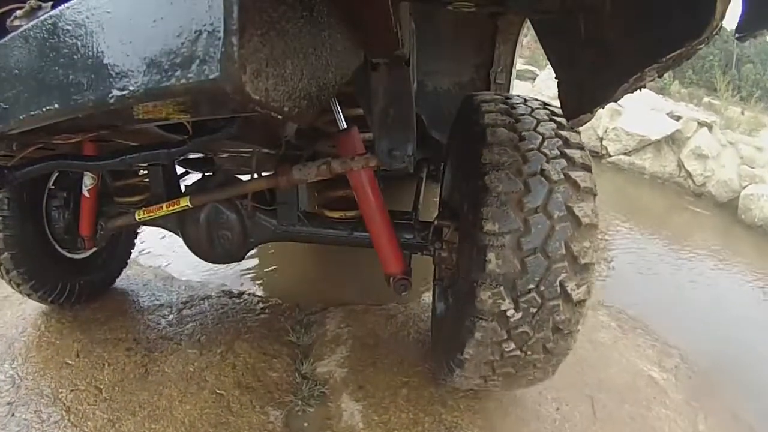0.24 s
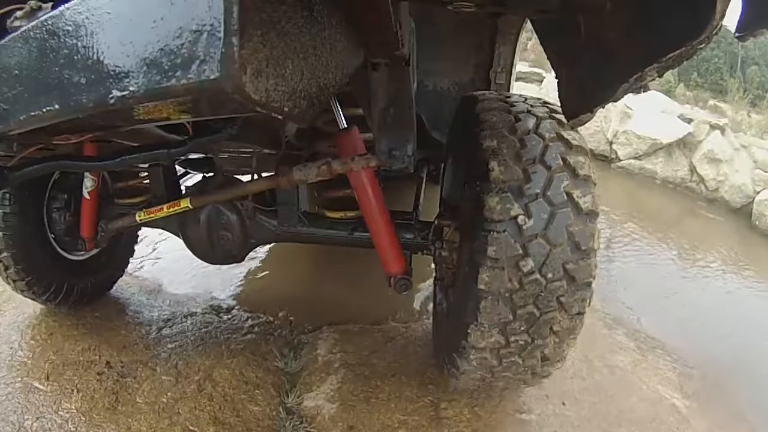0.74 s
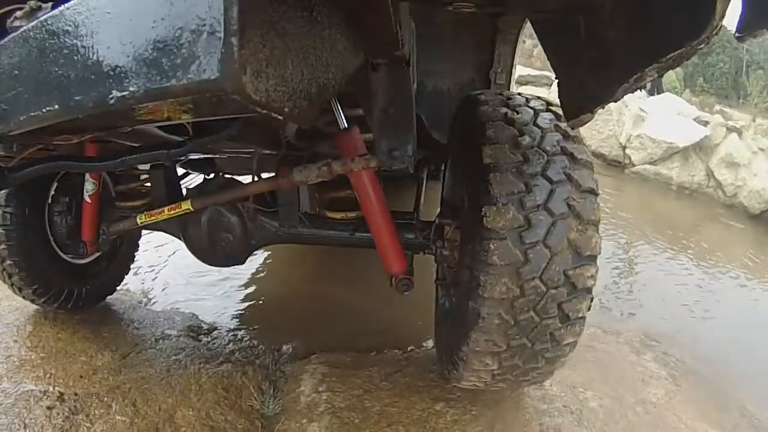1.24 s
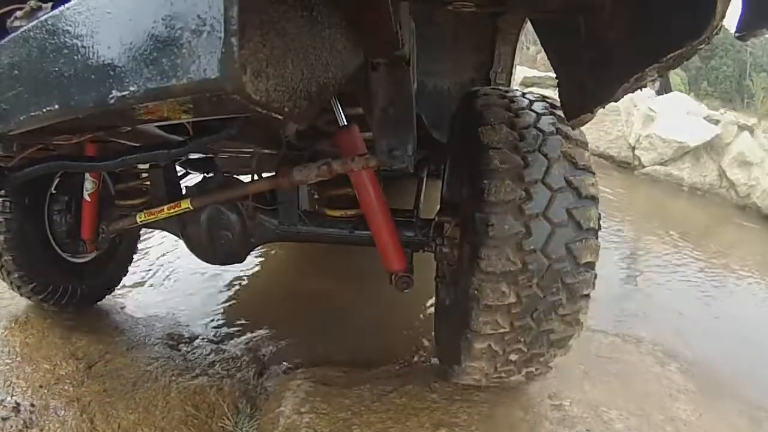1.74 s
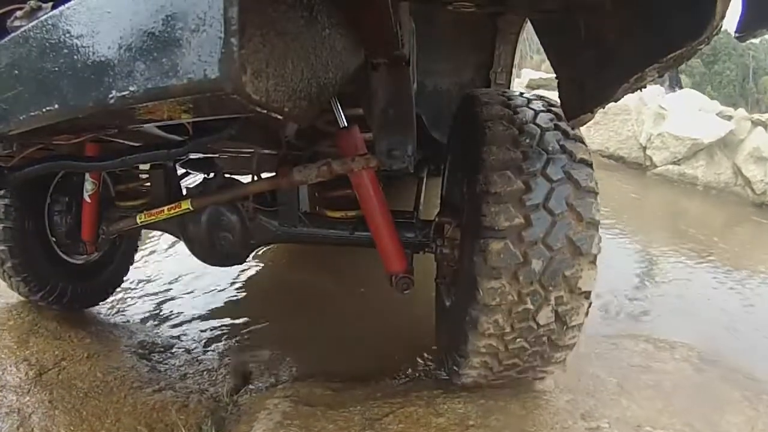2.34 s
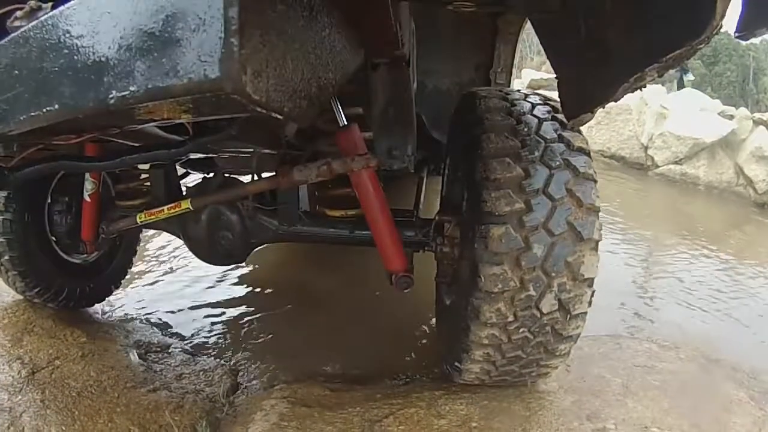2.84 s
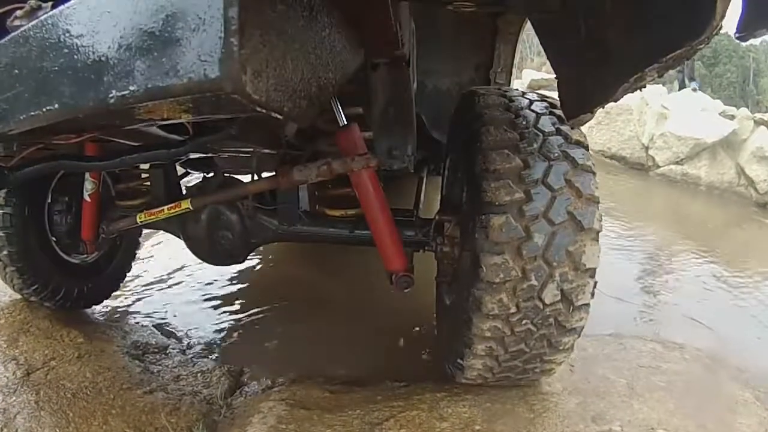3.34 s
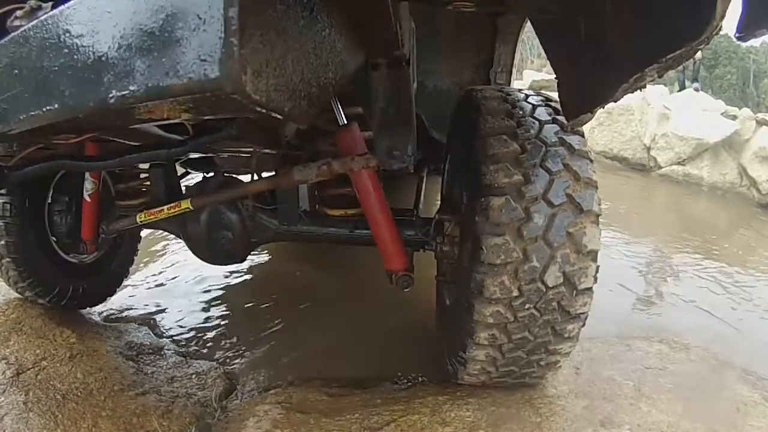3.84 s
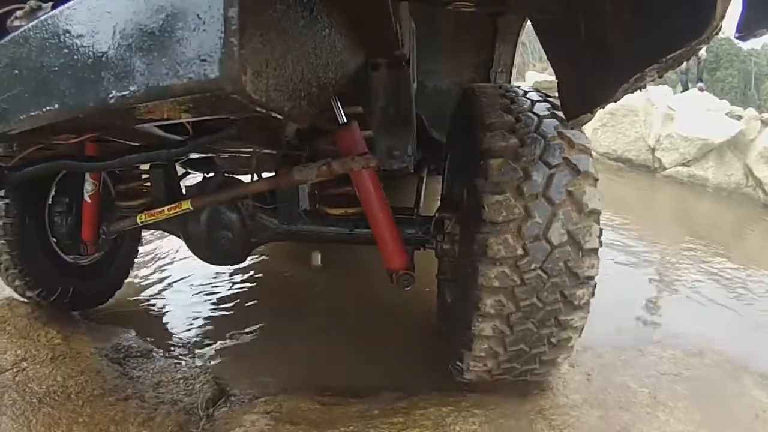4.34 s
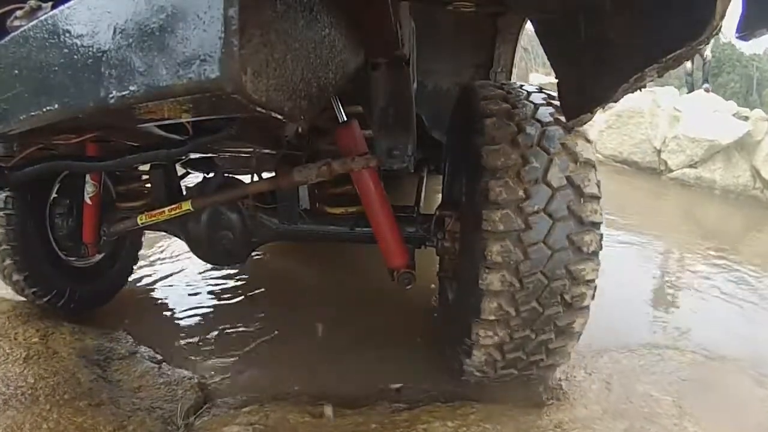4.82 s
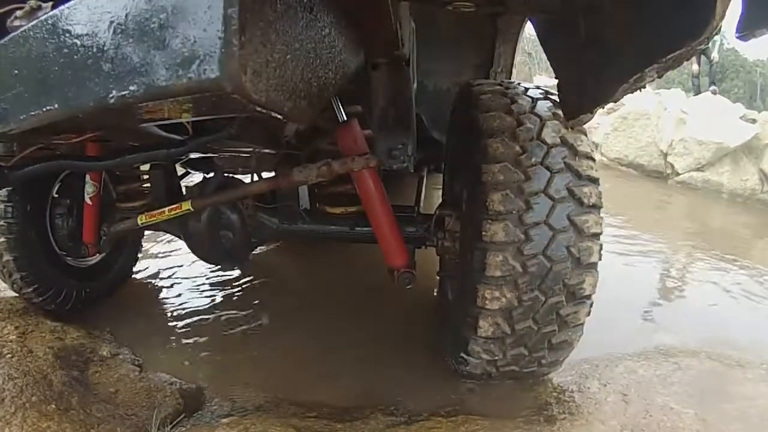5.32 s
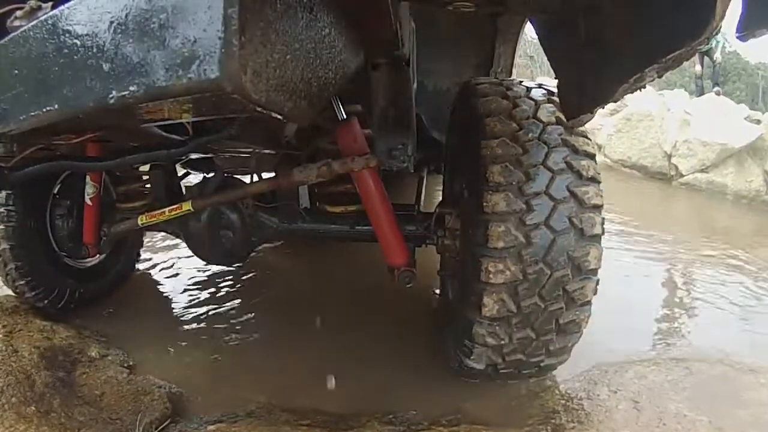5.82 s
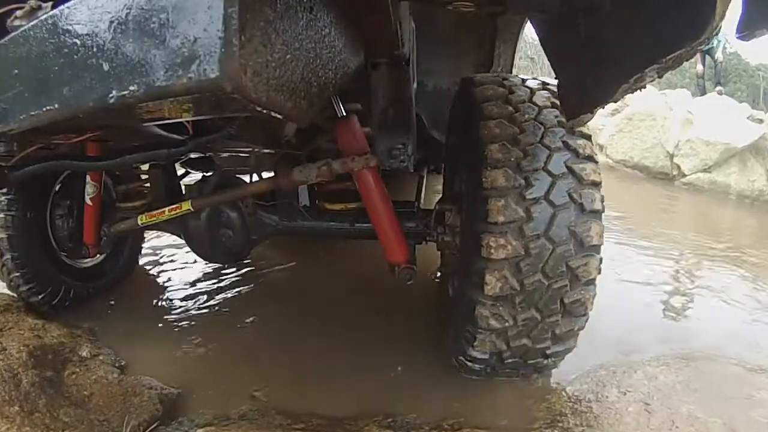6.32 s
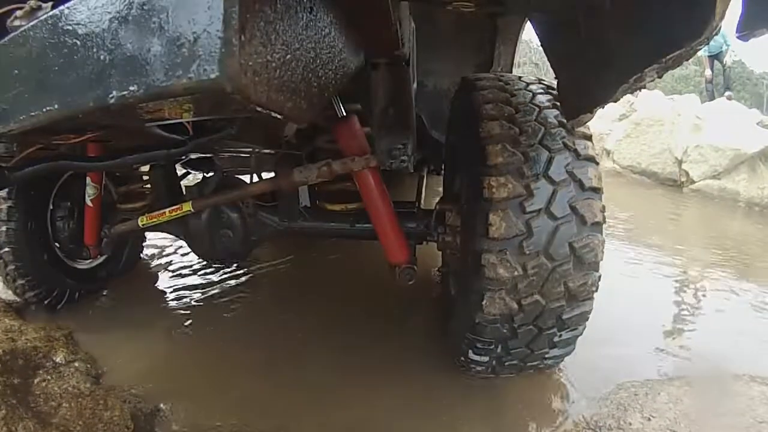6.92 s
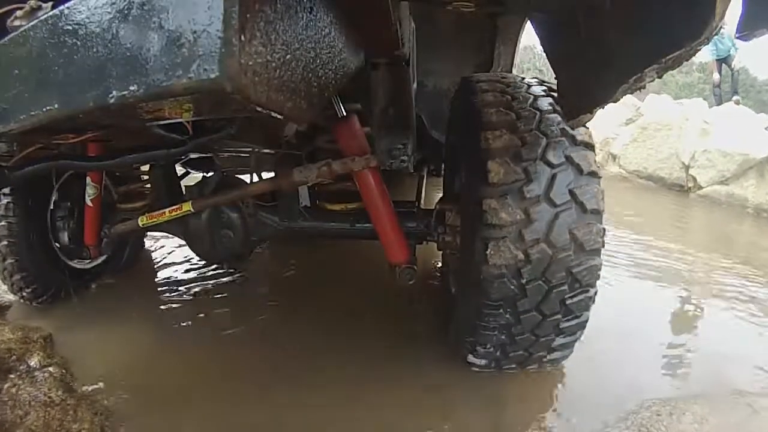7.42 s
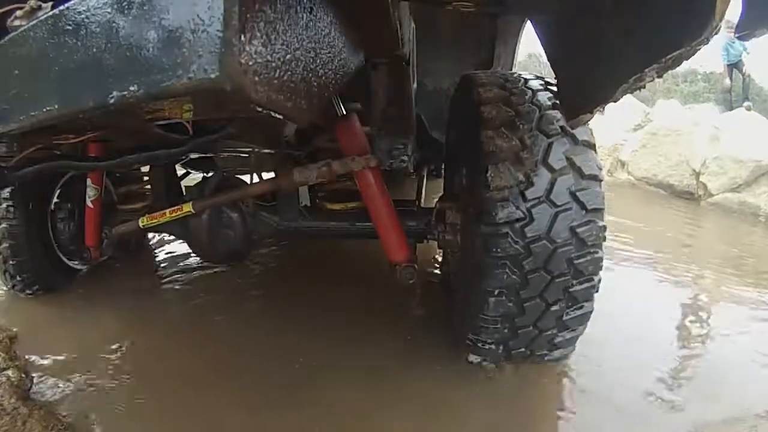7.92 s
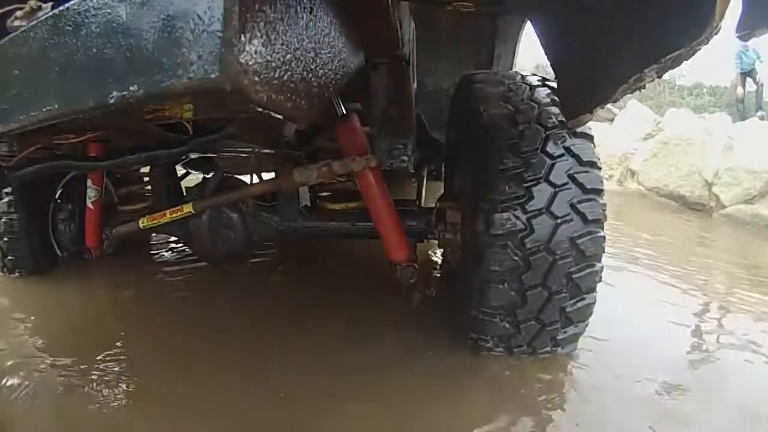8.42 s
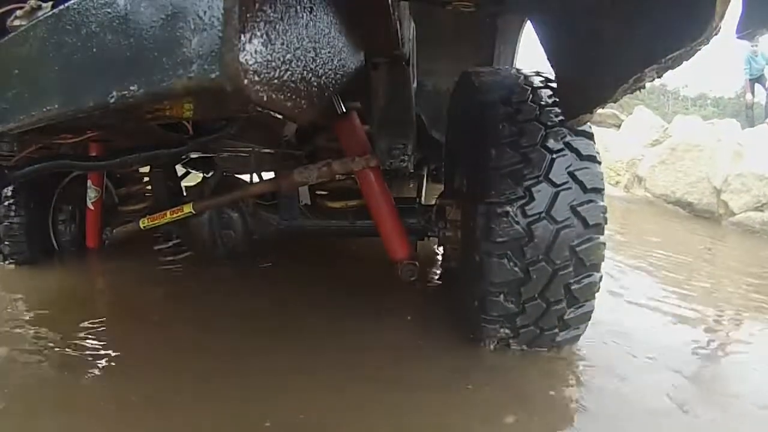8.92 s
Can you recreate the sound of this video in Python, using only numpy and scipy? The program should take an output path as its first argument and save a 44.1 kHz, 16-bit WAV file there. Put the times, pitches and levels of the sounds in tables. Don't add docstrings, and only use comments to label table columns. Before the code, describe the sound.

A low, lumpy six-cylinder diesel idle runs throughout, about 39 pulses a second, with rough frame rumble, muted injector clatter and a loosely ringing panel. The sealed microphone is bolted to the chassis, so everything is close, bassy and dull on top. From 0.2 to 1.5 seconds water slaps the underside, with a sharp metal knock at 0.6. Short hollow rubber groans near 200 hertz begin softly, jump out at 2.5 and are loudest from 3.0 to 3.3, with tiny crackles; the engine ducks, then recovers over about a second. More groans come between 4.7 and 6.1, with deep tyre thumps at 4.9 and 5.3 to 5.6. A very faint squeak passes at 6.15. Water swishes from 7.6 to 8.3; thumps land at 7.9 and 8.4. At 8.8 the hardest thump, a short dull clang and a splash arrive together, then idling continues to about 9.2.

```python
import sys
import numpy as np
from scipy import signal
from scipy.fft import rfft, irfft
from scipy.io import wavfile
from scipy.ndimage import uniform_filter1d, minimum_filter1d

SR = 44100
rng = np.random.default_rng(int(sys.argv[2]) if len(sys.argv) > 2 else 0)


def natural_amplitude(level_db):
    exponent = np.asarray(level_db, float) / 20
    return 10 ** exponent


def log_audio(samples):
    frames = np.atleast_2d(samples).T
    limited = np.clip(frames, -1, 1)
    pcm = np.round(limited * 32767).astype(np.int16)
    wavfile.write(sys.argv[1], SR, pcm)


N = 403956

# time_s, firing_rate_hz
FIRING_RATE = [(0.0, 38.75), (0.5, 37.48), (1.0, 39.51), (1.5, 40.4), (2.0, 40.05), (2.5, 39.18),
               (3.1, 39.71), (3.7, 39.14), (4.2, 39.03), (4.7, 39.2), (5.2, 39.14), (5.7, 39.28),
               (6.2, 38.95), (6.8, 39.09), (7.4, 39.11), (8.0, 38.7), (8.6, 38.7), (9.16, 38.47)]
# time_s, ground_roughness_db, engine_load_db, block_rocking_db
DRIVE = [(0, -22.5, -0.5, 3.5), (.5, -25, -3, 3.5), (1.0, -19, -0.5, 3.5), (1.4, -21.5, 0.5, -1),
         (1.9, -21, -0.5, -6), (2.3, -23.5, -1.5, 0.5), (2.7, -21.5, -3, 1.5), (3.1, -18, -4, 0.5),
         (3.5, -22.5, -2, 4), (4.0, -22.5, 0, 1.5), (4.5, -20.5, -0.5, 2.5), (5.0, -21.5, 0, 4),
         (5.9, -21, -1.5, 3.5), (6.5, -25, 1.5, -2.5), (7.2, -23, 3, -2), (8.0, -23.5, 0.5, -1),
         (8.7, -22.5, 3, 0.5), (9.16, -27.5, -2, 3.5)]
TONE_MULTIPLES = [2, 5 / 2, 3, 10 / 3, 7 / 2, 4, 9 / 2, 5, 6, 8]
TONE_DB = [-8, -12.5, 1.5, 0, -5.5, -6, -10, -4.5, -10.5, -21]
# time_s, change_db
LEANS = [(.15, 1.5), (1.05, 2.5), (1.6, 1), (2.02, 2), (4.3, 3), (4.8, -7), (4.97, 0.5), (5.5, 1.5),
         (6.05, -1), (6.62, 4), (7.0, -2), (7.27, 1), (7.55, 1), (7.85, 2.5), (8.05, -2.5), (8.25, 3),
         (8.6, 2.5), (8.82, 1.5), (8.98, -5.5)]
CYLINDER_DB = [-14, -16, -13.5, -17.5, -17.5, -15.5]
# pitch_hz, level_db (per Hz)
RUMBLE = [(7.1, -35), (24, -11), (70, -12.5), (103, -5.5), (129, 2), (173, -9.5), (232, -5), (284, -10),
          (399, -33.5), (444, -38), (480, -25.5), (620, -70.5), (1060, -120)]
# pitch_hz, level_db (per Hz)
CLATTER = [(240, -25.5), (400, 9), (451, -10), (549, -9), (679, -7.5), (865, -16), (1150, -19),
           (1360, -13.5), (1630, -18.5), (2210, -14.5), (3030, -27), (4850, -26.5), (6270, -36.5),
           (11300, -46.5), (13000, -48), (14800, -53)]
# pitch_hz, width_hz, boost_db
BLOCK_RINGS = [(629, 9.8, 6), (771, 77, 8.5), (980, 190, 6), (1370, 230, 5), (1897, 54, 9),
               (2170, 200, 8.5), (2706, 34, 8), (3680, 340, 4), (4800, 140, -5), (5460, 430, 2.5),
               (11500, 250, 0)]
# time_s, level_db
PANEL = [(0, -3.5), (.6, -4.5), (1.0, -3), (2.4, -4.5), (3.6, -3.5), (4.2, -2), (7.3, -0.5), (7.6, -6.5),
         (9.16, -3.5)]
# start_s (of full strength), hold_s, level_db, pitch_hz, grit_db (over the level)
SLIPS = [(0.63, 0.045, -22.5, 205, -6), (0.785, 0.015, -21.5, 202.9, -12), (0.93, 0.035, -24, 209, -17),
         (1.512, 0.036, -23, 194.3, -4.5), (1.992, .03, -20, 205, -13), (2.106, 0.035, -20, 214.7, -9.5),
         (2.388, 0.083, -14, 213.3, -17), (2.546, 0.041, -9.5, 213.3, -14), (2.904, 0.042, -23, 229, -16),
         (3.005, 0.055, -9.5, 212.2, -13), (3.09, 0.075, -7.5, 197.3, -8.5), (3.185, 0.054, -8, 199.6, -21),
         (3.251, .1, -12, 209.4, -22.5), (3.422, 0.23, -22.5, 212.3, -20), (3.725, 0.13, -19, 202, -30),
         (4.136, 0.05, -20, 197.9, -12.5), (4.708, 0.099, -20, 209.3, -5), (5.067, 0.043, -20, 214.5, -21),
         (5.202, 0.052, -11.5, 213.2, -29), (5.321, 0.15, -21.5, 212.1, -5.5),
         (5.523, 0.13, -21, 211.9, -23), (5.811, 0.04, -12, 214.2, -12), (5.946, 0.072, -17.5, 200.9, -3),
         (6.057, 0.058, -15, 196.7, -12), (8.802, 0.034, -24, 189.4, -9)]
# start_s, attack_s, depth_db
GRABS = [
    (2.553, 0.0077, -9),
    (3.019, 0.13, -15.5),
]
# start_s, peak_db, ring_hz, thud_db (over the peak)
KNOCKS = [(0.603, -19.5, 758, 2), (0.615, -24, 756, 9.5), (0.629, -28.5, 752, 13), (.645, -30, 690, 6),
          (0.66, -41, 760, 9), (.68, -37, 760, 9), (.787, -42, 700, 20), (0.9015, -35, 720, 14.5),
          (2.362, -34, 508, 19), (2.5505, -28.5, 618, 13), (2.564, -33.5, 599, 14), (2.882, -37, 943, 3.5),
          (2.984, -44, 555.6, 8.5), (4.059, -53, 779.4, 4), (5.319, -43, 736.4, 22.5),
          (5.822, -39, 698, 12), (5.998, -43, 540.2, 8), (8.083, -30, 678, -4), (8.101, -33.5, 800, 2),
          (8.118, -37.5, 771, 10), (8.7895, -30.5, 956, 17.5), (8.802, -38, 1096, 3), (8.823, -36, 844, 1)]
# start_s, peak_db
JOLTS = [
    (0.615, -39),
    (1.499, -31),
    (2.559, -30.5),
    (4.779, -21),
    (3.15, -29.5),
    (5.898, -38.5),
    (8.749, -46),
]
# start_s, peak_db
CRACKLE = [(2.5505, -46), (2.5721, -46.5), (3.0424, -53), (3.1067, -45.5), (3.1423, -44.5), (3.1494, -48),
           (3.1523, -49), (3.1551, -44.5), (3.1567, -44), (3.1616, -51), (3.181, -56), (3.185, -42.5),
           (3.202, -52), (3.205, -39.5), (3.2084, -50), (3.2132, -54), (3.227, -48.5), (3.2403, -50),
           (3.2445, -48), (3.2778, -52.5), (3.2892, -52), (3.302, -59.5), (3.3126, -51.5), (3.323, -60)]
# start_s, peak_db, pitch_hz
THUMPS = [
    (3.09, -30.5, 71.9),
    (3.16, -29, 66.3),
    (4.93, -19, 150.2),
    (5.322, -21.5, 325.3),
    (5.36, -11.5, 146.8),
    (5.49, -21, 154.2),
    (5.58, -14, 140.7),
    (7.896, -16, 142.1),
    (8.429, -10, 135.5),
    (8.803, -7, 130.2),
]
# pitch_hz, level_db, t60_s (time to die away)
CLANG = [(341, -24, .1), (520, -30.5, 0.089), (728, -30, 0.1), (1284, -37, .12), (1916, -37, 0.17),
         (3705, -56, .08)]
# pitch_hz, level_db
SQUEAK = [(10200, -70), (10950, -75)]
# start_s, hold_s, level_db
DOUSES = [
    (0.902, 0.027, -54),
    (1.197, 0.03, -44.5),
    (2.419, 0.022, -43),
    (5.983, 0.036, -48),
    (8.078, 0.032, -46),
    (8.789, 0.052, -46),
]
# start_s, spray_db, bubble_db (over the spray)
SLAPS = [(0.2177, -32, -9), (0.309, -26.5, -6), (0.4142, -46, 7), (0.526, -41, -4), (0.6597, -30.5, -6),
         (0.777, -31, -14), (0.902, -48, -8), (1.096, -34, -7), (1.201, -30.5, -14), (1.423, -33.5, 2.5),
         (2.0206, -42, 5.5), (5.246, -40.5, 2.5), (7.654, -37, -21), (8.1094, -37.5, -9),
         (8.791, -31.5, -5)]
# pitch_hz, level_db (per Hz)
SPRAY = [(550, -22), (900, -9), (1150, -6), (1700, -1.5), (2200, 0), (2600, -9), (2950, -28), (5000, -45),
         (9000, -75)]
# start_s, peak_db
SWISHES = [(.262, -42), (7.62, -44), (7.649, -41), (7.69, -40), (7.725, -38), (7.77, -39), (7.82, -45),
           (7.926, -37), (8.083, -39), (8.108, -41.5), (8.136, -45), (8.218, -39), (8.243, -36.5),
           (8.312, -42)]

FIRST_DB, TONES_DB, CLATTER_DB = -34.5, -26, -61
START_TURN = .18
HEAVY_TURN = 3.5
FIRST_LAG, FRAME_LEAD = .4, .68
LEAN_S = 0.073
PANEL_DB = 10
HUM_DB, UPPER_DB, SHUDDER_DB = -4.5, -12.5, -11.5
HUM_HZ, WANDER_HZ = 205, 7.99
SWELL_DB_S, FADE_DB_S, SAG_DB_S = 233, 302.5, 13
JUDDER_DB, HELD_S = 8, 0.034
RECOVER_DB_S = 14
KNOCK_T60_S, SNAP_DB, BLOW_HZ, BLOW_T60_S = 0.078, -35.5, 260, 0.053
CLANG_S, SQUEAK_S, SQUEAK_HOLD_S = 8.79, 6.15, .035
BUBBLE_HZ, BUBBLE_SPREAD, SLAP_T60_S = 938, 0.015, 0.17
SWISH_HZ, SWISH_WIDTH_HZ, SWISH_T60_S = 2040, 450, 0.11
TOP_HZ = 16500
FAINT_HZ, FAINT_DB, FAINT_SPREAD_DB = 9200, -108.5, 2.5


def level(x, db):
    return x * natural_amplitude(db) / np.sqrt(np.mean(np.abs(x) ** 2))


def curves(table):
    s, *columns = np.transpose(table)
    return [np.interp(np.arange(N) / SR, s, column) for column in columns]


def walk(rate):
    k = int(SR / rate)
    steps = np.repeat(rng.standard_normal(N // k + 1), k)
    smooth = uniform_filter1d(uniform_filter1d(steps, k), k)
    return level(smooth[:N], 0)


def colour(x, spectrum, modes=(), size=2 ** 15):
    f = np.arange(size // 2 + 1) * SR / size + .1
    hz, db = np.transpose(spectrum)
    lift = 1 + sum(natural_amplitude(2 * d) / (1 + (2 * (f - c) / w) ** 2) ** 2 for c, w, d in modes)
    gain = natural_amplitude(np.interp(np.log(f), np.log(hz), db)) * np.sqrt(lift)
    cepstrum = irfft(np.log(gain), size)
    cepstrum[1:size // 2] *= 2
    cepstrum[size // 2 + 1:] = 0
    ringing = irfft(np.exp(rfft(cepstrum)), size)[:size // 2]
    return signal.fftconvolve(x, ringing)[:N]


def band(lo_hz, hi_hz, order=2):
    edges = signal.butter(order, [lo_hz, hi_hz], "bandpass", fs=SR, output="sos")
    return level(signal.sosfilt(edges, rng.standard_normal(N)), 0)


def even(x, share):
    power = np.abs(x) ** 2
    swell = np.sqrt(uniform_filter1d(power, size=900) + 1e-3 * np.mean(power))
    return level(x / swell ** share, 0)


def add(out, s, grain):
    i = int(s * SR)
    out[i:i + len(grain)] += grain[:N - i]


def span(s, t):
    return slice(int(s * SR), int(s * SR) + len(t))


def fade(t60, rise):
    t = np.arange(int(1.5 * t60 * SR)) / SR
    return t, (1 - np.exp(-t / rise)) * natural_amplitude(-60 * t / t60)


def crank():
    return START_TURN + np.cumsum(curves(FIRING_RATE)[0]) / SR


def firing_tones(turns, load_db, rock_db):
    first_db = FIRST_DB + load_db + walk(9.3)
    out = np.sqrt(2) * natural_amplitude(first_db) * np.cos(2 * np.pi * (turns - FIRST_LAG))
    times = np.arange(0, N / SR, 1 / 100)
    leaning = [(u, sum(db * np.exp(-((u - s) / LEAN_S) ** 2) for s, db in LEANS)) for u in times]
    lean_db = curves(leaning)[0]
    for k, db in zip(TONE_MULTIPLES, TONE_DB):
        lead = FRAME_LEAD - .72 * max(k - 3.5, 0)
        rocking_db = (k % 1 > 0) * rock_db
        tone_db = TONES_DB + load_db + db + rocking_db + lean_db + 0.39 * walk(6.6)
        out += natural_amplitude(tone_db) * np.cos(2 * np.pi * (k * (turns - HEAVY_TURN) + lead))
    return out


def road_rumble(ground_db):
    rumble = colour(rng.standard_normal(N), RUMBLE, [(136.0, 27, 2), (376.0, 10, 1)])
    return natural_amplitude(ground_db - 4.5 + 2.5 * walk(12)) * level(rumble, 0)


def clatter(turns, load_db):
    firing = turns.astype(int)
    chance_db = 3.6 * np.minimum(rng.standard_normal(N // 500), 1.3)[firing]
    strength = natural_amplitude(np.take(CYLINDER_DB, firing % len(CYLINDER_DB)) + chance_db)
    gate = 0.31 + uniform_filter1d(strength * np.exp(-(turns % 1) / 0.5), size=160)
    # (Hz, flicker dB)
    regions = [(350, 2.3), (700, 0.98), (1400, 1.1), (2800, 0.68), (5300, 0.5), (9000, 1), (12000, 1.2)]
    parts = np.zeros(N)
    for hz, flicker_db in regions:
        rattle = band(hz / np.sqrt(2), hz * np.sqrt(2))
        parts += np.sqrt(hz) * natural_amplitude(flicker_db * walk(12)) * rattle
    parts += np.sqrt(11300) * natural_amplitude(-13 + 4 * walk(14)) * band(11250, 11370)
    valve_gear = natural_amplitude(0.25 * walk(400))
    block = level(colour(gate * valve_gear * parts, CLATTER, BLOCK_RINGS), 18.84)
    cycle = np.pi * (turns - 4) / 3
    panel = (1 + .45 * np.cos(cycle) + .35 * np.cos(2 * cycle)) * even(band(680, 689), .8)
    panel = natural_amplitude(curves(PANEL)[0]) * level(panel, PANEL_DB)
    return natural_amplitude(CLATTER_DB + 0.2 * load_db) * (block + panel)


def engine(turns, ground_db, load_db, rock_db):
    return firing_tones(turns, load_db, rock_db) + road_rumble(ground_db) + clatter(turns, load_db)


def slips(rest_db):
    t = np.arange(N) / SR
    groan, upper, judder = (natural_amplitude(2 * (rest_db + db + 1.9 * walk(14))) for db in (HUM_DB, UPPER_DB, SHUDDER_DB))
    pitch = groan * (HUM_HZ + WANDER_HZ * walk(12))
    for s, hold, db, hz, grit_db in SLIPS:
        at = slice(max(int((s - .3) * SR), 0), int((s + hold + .3) * SR))
        since = t[at] - s
        swell_db = SWELL_DB_S * np.maximum(-since, 0)
        fade_db = FADE_DB_S * np.maximum(since - hold, 0)
        sag_db = SAG_DB_S * np.maximum(since, 0)
        power = natural_amplitude(2 * (db - swell_db - fade_db - sag_db))
        groan[at] += power
        pitch[at] += power * hz
        upper[at] += power * natural_amplitude(2 * grit_db)
        judder[at] += power * natural_amplitude(2 * (grit_db + JUDDER_DB)) * min(HELD_S / hold, 1) ** 3
    pitch_hz = pitch / groan + 2.955 * walk(25)
    return pitch_hz, *(10 * np.log10(p) for p in (groan, upper, judder))


def mount(turns, rest_db):
    hz, groan_db, upper_db, judder_db = slips(rest_db)
    clean = np.clip(np.maximum((groan_db + 28) / 13, (groan_db - upper_db - 11) / 7), 0, 1)
    shake = even(walk(70) + 1j * walk(70), 0.42)
    beat = 2 * np.pi * (turns - .27)
    throb = natural_amplitude(np.minimum(judder_db - 0.5, groan_db - 9.5)) * np.cos(beat)
    throb = throb + natural_amplitude(upper_db - 9.0) * np.exp(1j * beat)
    swell = natural_amplitude(groan_db - .8 + 1.5 * walk(30)) * (clean + (1 - .93 * clean) * shake)
    groan = (swell + throb) * np.exp(2j * np.pi * np.cumsum(hz) / SR)
    upper = natural_amplitude(upper_db - 5.5) * even(band(305, 338) + .8 * band(235, 375, order=5), .3)
    scrape = (natural_amplitude(upper_db - 35) + natural_amplitude(1.3 * groan_db - 43)) * even(band(450, 950, order=3), .5)
    judder = natural_amplitude(judder_db + 1.0) * even(band(162, 203.2, order=3), 1.0)
    return np.sqrt(2) * groan.real + upper + scrape + judder


def knocks():
    out = np.zeros(N)
    rattle = even(band(600, 950, order=5), .7)
    thud = even(band(230, 400, order=4), .7)
    snap = band(1100, 4200, order=4)
    for s, db, hz, thud_db in KNOCKS:
        t, env = fade(KNOCK_T60_S, .0012)
        at = span(s, t)
        noise = .2 * rattle[at] + .45 * natural_amplitude(thud_db) * thud[at] + natural_amplitude(SNAP_DB) * snap[at]
        noise += 0.35 * natural_amplitude(thud_db - 60 * t / BLOW_T60_S) * np.sin(2 * np.pi * BLOW_HZ * t)
        add(out, s, natural_amplitude(db) * env * (.8 * np.sin(2 * np.pi * hz * (t + s)) + 1.3 * noise))
    return out


def body_heaves():
    out = np.zeros(N)
    for s, db in JOLTS:
        t, env = fade(.5, .03)
        add(out, s, natural_amplitude(db - 2.5) * env * np.sin(2 * np.pi * 19 * t))
    return out


def overload_ticks():
    ticks = np.zeros(N)
    for s, db in CRACKLE:
        t, env = fade(.0011, .0001)
        add(ticks, s, natural_amplitude(db + 21.5) * env * np.cos(2 * np.pi * 1900 * t))
        t, env = fade(.003, .0002)
        add(ticks, s, natural_amplitude(db + 21.5) * env * np.sin(2 * np.pi * 800 * t))
    return signal.sosfilt(signal.butter(4, 8500, fs=SR, output="sos"), ticks)


def underbody():
    out = np.zeros(N)
    wash = even(band(560, 1100, order=3), .5)
    for s, hold, db in DOUSES:
        t = np.arange(int((hold + .1) * SR)) / SR
        env = natural_amplitude(db - 470 * np.maximum(t - hold, 0)) * (1 - np.exp(-t / .003))
        add(out, s, env * wash[span(s, t)])
    for hz, db, t60 in CLANG:
        t, env = fade(t60, .002)
        add(out, CLANG_S, natural_amplitude(db) * env * np.sin(2 * np.pi * hz * t))
    t, env = fade(.12, .002)
    add(out, CLANG_S, natural_amplitude(-49.5) * env * band(2500, 4600)[:len(t)])
    for s, db, hz in THUMPS:
        t, env = fade(0.12, 0.01)
        add(out, s, natural_amplitude(db + 7.5) * env * np.sin(2 * np.pi * hz * t))
    t = np.arange(int(SQUEAK_HOLD_S * SR)) / SR
    squeak = sum(natural_amplitude(db) * np.sin(2 * np.pi * hz * t) for hz, db in SQUEAK)
    add(out, SQUEAK_S, np.sin(np.pi * t / SQUEAK_HOLD_S) * squeak)
    return out


def water():
    out = np.zeros(N)
    ragged = natural_amplitude(3.5 * walk(300)) * rng.standard_normal(N)
    spray = even(colour(ragged, SPRAY, BLOCK_RINGS), .8)
    for s, db, bubble_db in SLAPS:
        hz = BUBBLE_HZ * (1 + BUBBLE_SPREAD * rng.standard_normal())
        t, env = fade(SLAP_T60_S, .0035)
        bubble = natural_amplitude(bubble_db) * np.sin(2 * np.pi * hz * (t + 0.4 * t ** 2))
        runoff = env + 0.088 * np.exp(-((t - .035) / 0.039) ** 2)
        add(out, s, natural_amplitude(db - 7.0) * (runoff * spray[span(s, t)] + 1.7 * env * bubble))
    sheet = even(band(SWISH_HZ - SWISH_WIDTH_HZ / 2, SWISH_HZ + SWISH_WIDTH_HZ / 2), .5)
    for s, db in SWISHES:
        t, env = fade(SWISH_T60_S, 0.0069)
        add(out, s, natural_amplitude(db) * env * sheet[span(s, t)])
    for when, pitch, size in rng.random((200, 3)):
        hz = 700 * 3.5 ** pitch
        t, env = fade(14 / hz, .0006)
        bubble = np.sin(2 * np.pi * hz * t * (1 + 0.0093 * hz * t))
        add(out, when * N / SR, natural_amplitude(-43.5 - 14 * size) * env * bubble)
    return out


def duck():
    t = np.arange(N) / SR
    gains = []
    for s, attack, db in GRABS:
        pull = db * np.clip((t - s) / attack, 0, 1)
        recovery = RECOVER_DB_S * np.maximum(t - s - attack, 0)
        gains.append(np.minimum(pull + recovery, 0))
    return np.min(gains, axis=0)


def thin(x, size=1024):
    f, _, z = signal.stft(x, SR, nperseg=size)
    for lo in np.arange(FAINT_HZ, 15500, 650):
        at = (f >= lo) & (f < lo + 650)
        db = 10 * np.log10(np.mean(np.abs(z[at]) ** 2, axis=0) + 1e-18)
        luck = np.repeat(rng.standard_normal(len(db)), 2)[:len(db)]
        z[at] *= np.where(db > FAINT_DB + FAINT_SPREAD_DB * luck, 1, .08)
    return signal.istft(z, SR, nperseg=size)[1][:N]


def scene():
    turns, gain_db = crank(), duck()
    ground_db, load_db, rock_db = curves(DRIVE)
    out = natural_amplitude(gain_db) * engine(turns, ground_db, load_db, rock_db)
    out += mount(turns, ground_db - 0.73 * load_db + gain_db)
    out += knocks() + body_heaves() + overload_ticks()
    out += underbody() + water()
    return out[None]


def roll_off(x):
    return signal.sosfilt(signal.butter(12, 14990, fs=SR, output="sos"), x)


def record(dry):
    from_ends = np.minimum(np.arange(N), np.arange(N)[::-1])
    ease = np.minimum(from_ends / (SR / 200), 1)
    room = np.minimum(.93 / (np.abs(dry[0]) + 1e-9), 1)
    limit = uniform_filter1d(minimum_filter1d(room, size=601), size=601)
    cut = signal.sosfilt(signal.butter(6, TOP_HZ, fs=SR, output="sos"), ease * limit * dry)
    return roll_off(thin(cut[0])[None])


dry = scene()
out = record(dry)
log_audio(out)
```